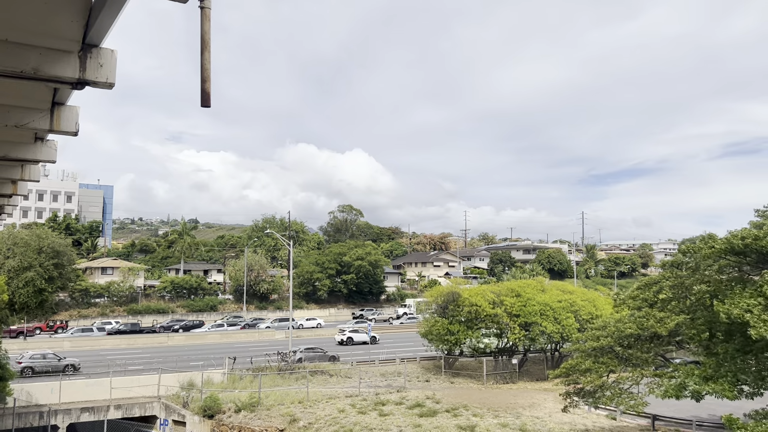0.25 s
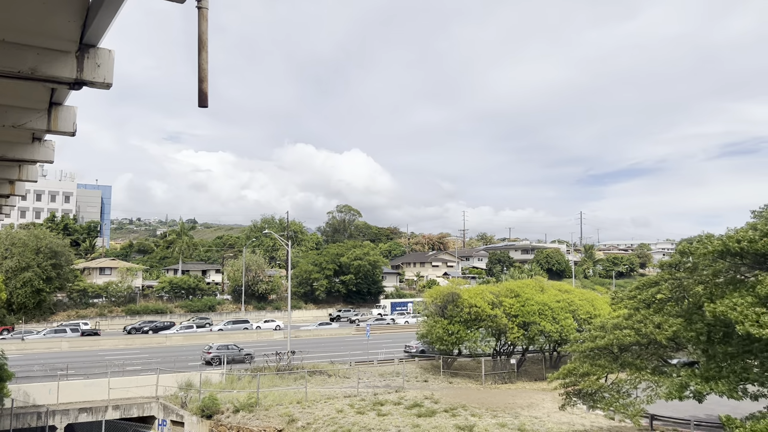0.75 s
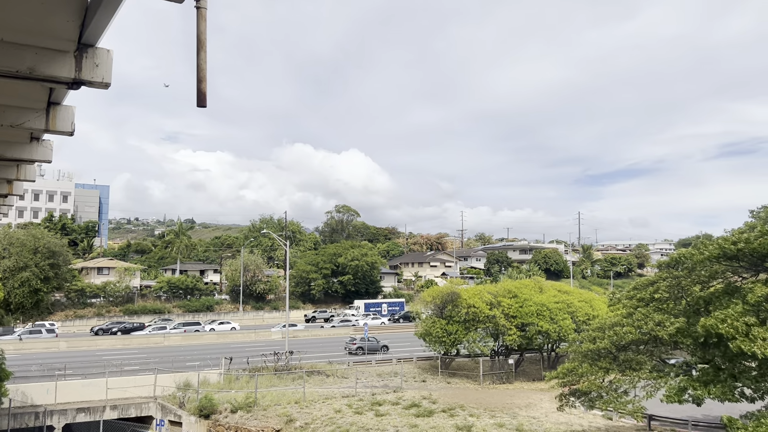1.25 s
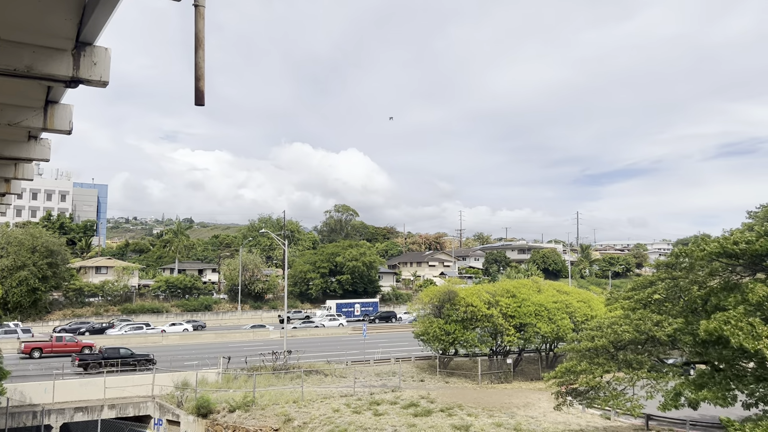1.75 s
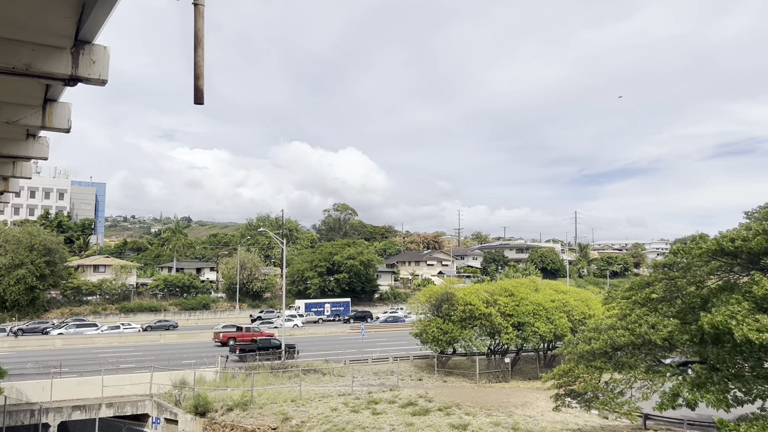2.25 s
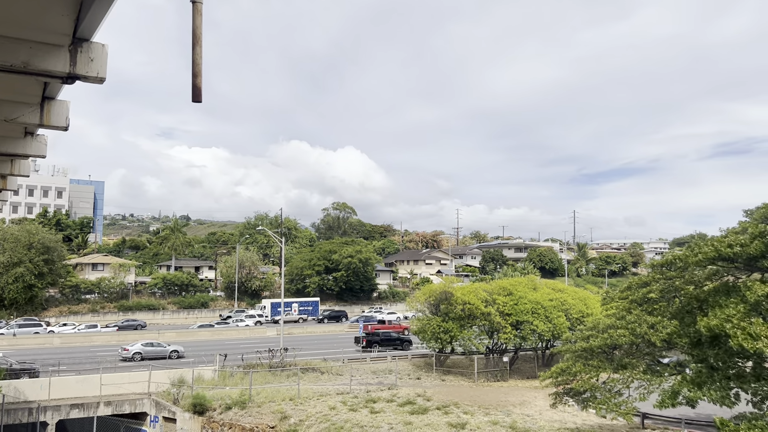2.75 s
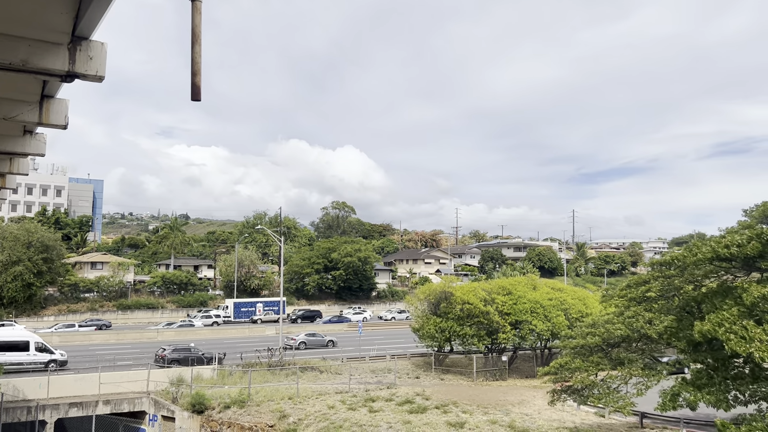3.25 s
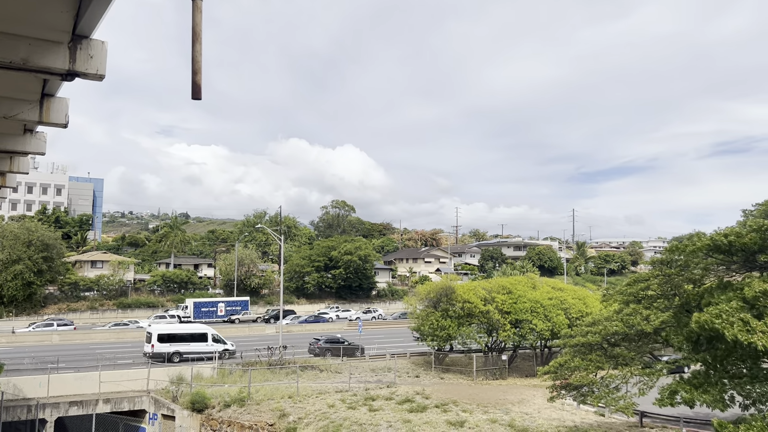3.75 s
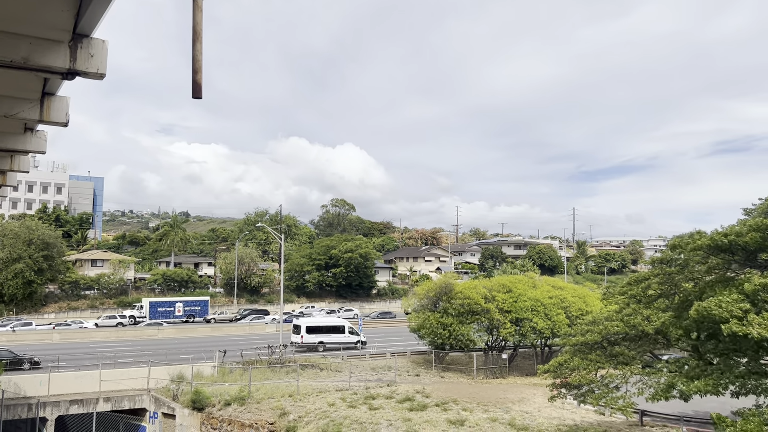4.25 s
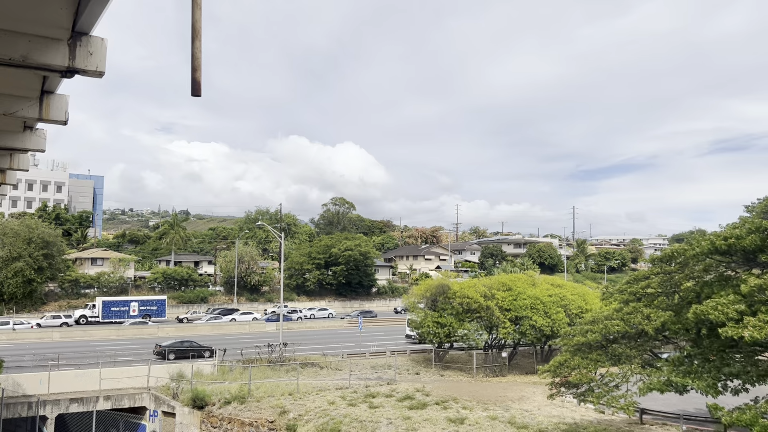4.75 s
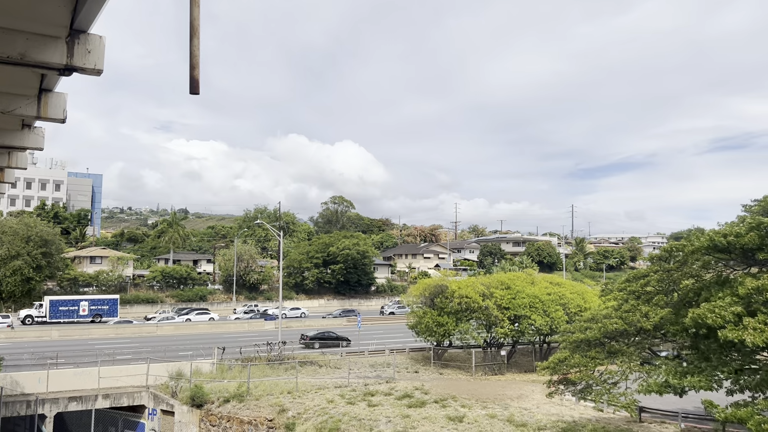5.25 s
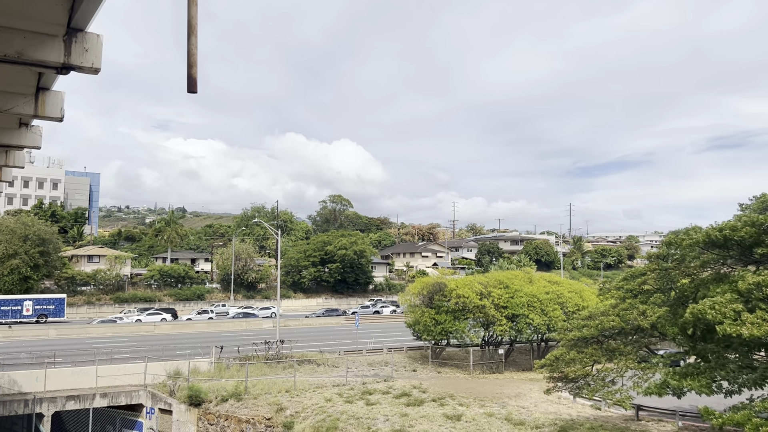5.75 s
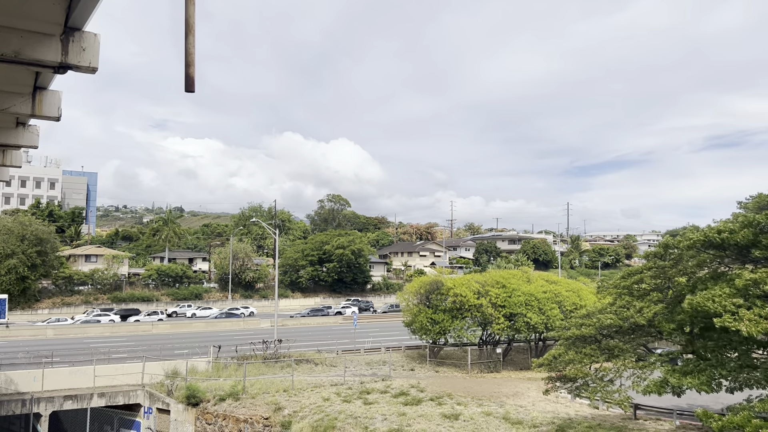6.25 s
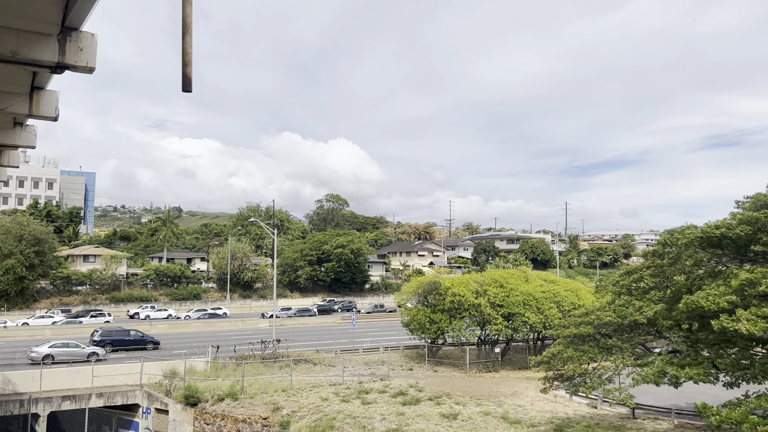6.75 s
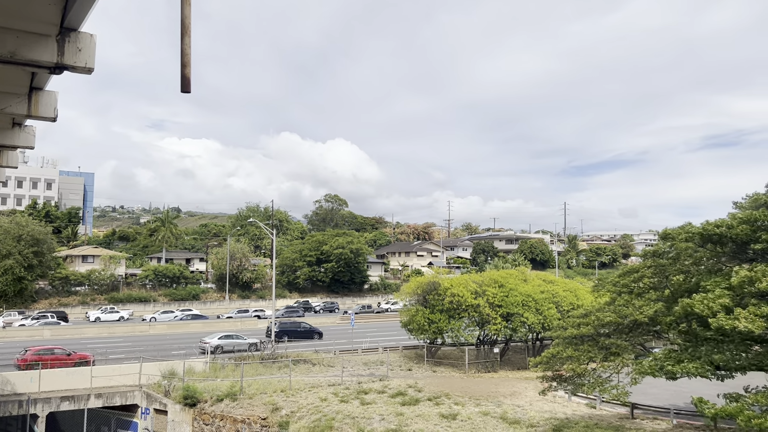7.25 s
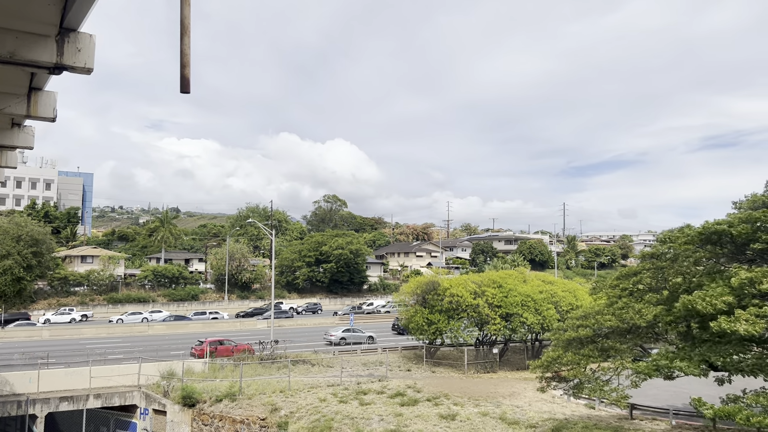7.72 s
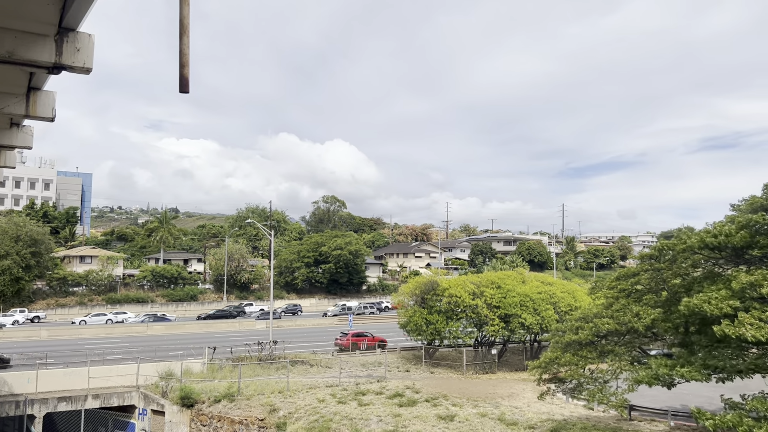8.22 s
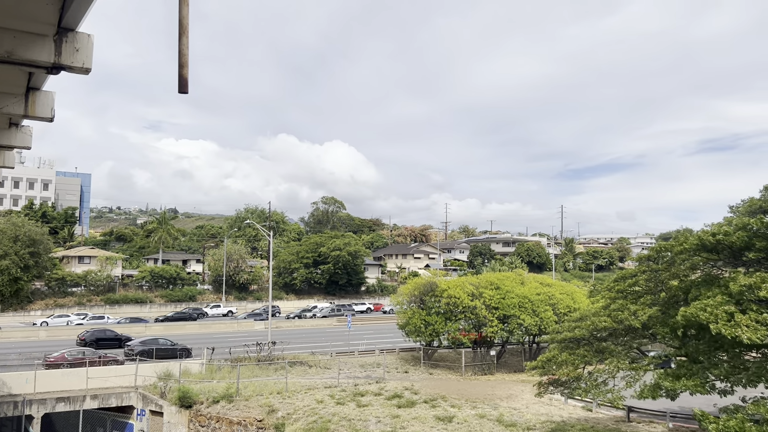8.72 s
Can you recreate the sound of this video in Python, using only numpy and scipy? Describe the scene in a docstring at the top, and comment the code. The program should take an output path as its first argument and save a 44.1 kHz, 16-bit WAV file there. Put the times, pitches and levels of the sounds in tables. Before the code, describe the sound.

Cars and trucks stream along a wide freeway, heard from above as a continuous tyre roar and hiss over low engine rumble, swelling gently as vehicles pass. Gusts of wind thump and flutter on a hand-held phone microphone, strongest in the first half and easing later. A faint machine hum sits underneath, and the hand makes a few tiny ticks and rustles.

```python
"""A ledge above a wide freeway. Many tyres add incoherently into a roar and hiss that swell as vehicles
pass; the nearest treads sing, engines rumble far off, a faint whine comes and goes and a machine hums
nearby. Turbulent gusts press on the two microphone ports of a hand-held phone as thump, flutter,
hollow boom and slaps. The hand that holds it adds small ticks and rustles of friction."""
import sys
import numpy as np
from scipy import signal
from scipy.fft import rfft, irfft, next_fast_len
from scipy.io import wavfile
from scipy.ndimage import uniform_filter1d, map_coordinates

SR = 44100
rng = np.random.default_rng(int(sys.argv[2]) if len(sys.argv) > 2 else 0)


def generate_wav(sig):
    """Save sig (samples, or channels by samples) to the path in sys.argv[1] as 16-bit PCM at SR."""
    pcm = np.round(np.clip(np.atleast_2d(sig).T, -1, 1) * 32767).astype(np.int16)
    wavfile.write(sys.argv[1], SR, pcm)


N = 396018

# stream of vehicles: (time [s], tyre roar [dB], tyre hiss [dB], swish of far tyres [dB])
TYRE_LEVELS = [(0, -26.5, -33, -53), (.35, -26.5, -35, -57), (.63, -27.5, -35, -54), (1, -28, -37, -58),
               (1.55, -30, -37, -57), (1.8, -26.5, -34, -55.5), (2.4, -28.5, -34, -54),
               (2.77, -24.5, -32.5, -54.5), (3.1, -27, -32, -53), (3.6, -25.5, -33, -55.5),
               (3.78, -27.5, -30, -52.5), (4.02, -26.5, -29, -52), (4.12, -29.5, -32.5, -55),
               (4.3, -23, -31.5, -55), (4.42, -26.5, -33, -55), (4.9, -26.5, -33.5, -55),
               (5.75, -29, -32, -55.5), (6.05, -26.5, -35, -57.5), (6.3, -31, -36, -57.5),
               (6.7, -28.5, -35, -58), (8.2, -29.5, -35.5, -57.5), (8.98, -26, -35.5, -57.5)]
# engines and distant lanes: (time [s], level [dB])
RUMBLE_LEVELS = [(0, -26.5), (2.5, -29), (4.5, -28), (6.5, -29.5), (8, -29.5), (8.98, -26.5)]
# drone of tyres and bodywork, fuller near a large vehicle: (time [s], relative level [dB])
DRONE_LEVELS = [(0.0, -35), (0.3, -30.5), (0.77, -31.5), (0.85, -29), (0.9, -34), (1.7, -34.5),
                (2.25, -28.5), (2.3, -37.5), (2.7, -31), (3.88, -34.5), (4.0, -33), (4.08, -40),
                (4.32, -26), (4.45, -32.5), (8.45, -37), (8.98, -37.5)]
# spectra of the traffic noises: (frequency [Hz], relative spectral density [dB])
ROAR_SPECTRUM = [(290, -34.5), (500, -13.5), (635, -13), (749, -1), (792, -3.5), (1030, -0.5), (1280, -6),
                 (1500, -9.5), (1950, -41.5), (3300, -120)]
HISS_SPECTRUM = [(1100, -22), (1250, -8.5), (1520, -0.5), (1690, -7.5), (1970, -6), (2250, -14),
                 (2820, -22.5), (3200, -28.5), (3800, -34.5), (4400, -45)]
SWISH_SPECTRUM = [(2900, -16.5), (3500, -3.5), (4200, -3), (4750, 1), (5400, -2.5), (6300, -9.5),
                  (7200, -16), (8200, -23), (9200, -42)]
RUMBLE_SPECTRUM = [(15, -58.5), (25, -11.5), (123, -2.5), (155, -5.5), (214, -6), (253, -5), (325, -10.5),
                   (369, -5), (568, -21), (700, -23.5), (910, -39), (1540, -120)]
DRONE_SPECTRUM = [(400, -13.5), (450, -1), (520, -2), (600, -2.5), (680, -4.5), (760, -20.5)]
# tread song of the nearest vehicles: (time [s], centre frequency [Hz], level [dB])
TREAD_BAND = [(0, 902.6, -44.5), (.35, 897.5, -34), (1.1, 856.3, -52.5), (1.55, 736.6, -35.5),
              (1.75, 833, -31), (2.05, 805, -35.5), (2.3, 803, -35.5), (2.7, 782.8, -30), (3.1, 839, -44),
              (3.6, 950, -43), (4.3, 830, -34.5), (4.8, 958, -52), (5.6, 1067, -37.5), (6.2, 1002, -49),
              (6.9, 778.6, -35.5), (7.5, 790, -42), (8.1, 858, -61), (8.7, 880, -44)]
# thin whine, perhaps a brake: (time [s], centre frequency [Hz], level [dB])
WHINE_BAND = [(1.65, 3210, -88), (1.78, 3270, -58), (1.92, 3270, -67), (2.2, 3320, -60), (2.5, 3270, -61),
              (2.65, 3320, -93)]

# gusts on the ports: (centre time [s], half length [s], thump [dB], flutter [dB], boom [dB])
GUST_SWELLS = [(0.0, 0.032, -16.5, -20, -28.5), (0.19, 0.036, -18, -31, -33.5),
               (0.33, 0.11, -13.5, -19.5, -28.5), (0.52, .03, -21, -24, -32.5),
               (0.828, .022, -14.5, -19, -25), (0.87, .025, -13.5, -20, -27), (0.93, .025, -17, -24, -27),
               (1.01, 0.023, -14, -25, -31.5), (1.09, 0.017, -20.5, -29.5, -32),
               (1.29, 0.057, -19, -27, -40), (1.41, .06, -14.5, -24, -31.5), (1.78, 0.017, -22.5, -26, -37),
               (2.05, .05, -12, -20, -32.5), (2.118, 0.03, -12, -17.5, -24),
               (2.158, 0.03, -12.5, -21.5, -29), (2.23, .025, -17.5, -20.5, -26.5),
               (2.275, 0.035, -16, -23.5, -29.5), (2.94, .05, -24, -29, -34.5),
               (3.23, 0.081, -18, -28.5, -34), (3.39, .04, -24.5, -28, -35), (3.57, 0.036, -19, -22.5, -30),
               (3.9, 0.044, -19, -22.5, -32.5), (4.01, 0.057, -19.5, -17, -26),
               (4.145, 0.017, -17, -24, -33.5), (4.22, 0.034, -15.5, -18, -26.5),
               (4.285, .03, -15.5, -19.5, -23), (4.335, .03, -15.5, -20, -24.5),
               (4.385, 0.027, -13, -25.5, -30), (4.5, 0.023, -16.5, -31, -39),
               (4.67, 0.023, -21, -26.5, -35), (4.84, 0.031, -23, -26.5, -36.5),
               (4.99, 0.024, -19, -27, -30.5), (5.08, 0.06, -20.5, -24.5, -26.5),
               (5.31, 0.027, -22, -35, -36), (5.71, 0.031, -24.5, -30.5, -31),
               (5.93, 0.055, -26.5, -31.5, -33), (6.08, 0.041, -26, -34, -27.5),
               (6.34, 0.066, -18, -25.5, -32.5), (6.47, 0.04, -23, -29, -37),
               (6.66, 0.021, -28, -30, -27.5), (6.93, 0.043, -20, -25, -39),
               (7.05, 0.027, -24, -20.5, -37.5), (7.15, 0.026, -22, -32.5, -31.5),
               (7.24, .03, -21, -31, -34.5), (7.36, 0.051, -26, -28, -34), (7.77, .06, -19, -42, -36.5),
               (7.97, 0.032, -24.5, -40.5, -41), (8.57, 0.05, -21, -41, -45),
               (8.98, 0.026, -8.5, -36, -39.5)]
# wind between the gusts: (time [s], thump [dB], flutter [dB])
BREEZE_LEVELS = [(0, -23.5, -30), (1.2, -19.5, -25), (1.6, -23, -25), (2.6, -24.5, -32), (3.3, -25, -25),
                 (4.1, -23, -26), (5.2, -24.5, -31), (6.6, -27, -28.5), (7.6, -27, -38.5), (8.2, -36, -48),
                 (8.5, -26.5, -42), (8.98, -37, -40)]
# pressure oscillation inside the gusts: (time [s], frequency [Hz])
SWING_PITCH = [(0, 57.4), (.33, 57.8), (.85, 64.05), (1.3, 56.2), (1.8, 55.05), (2.1, 62), (3.2, 67.8),
               (3.9, 62), (4.2, 60.1), (4.38, 54.8), (4.7, 66), (5.08, 55.1), (5.7, 55.7), (6.33, 52),
               (6.6, 66.3), (6.93, 53), (7.3, 68.2), (7.77, 50.84), (8.5, 70.05), (8.98, 58.1)]
# brief accents, one in the tyres' tread song (2.645 s), the others slaps inside the gusts:
# (time [s], peak level [dB], ring frequency [Hz])
RINGING_ACCENTS = [(0.812, -9.5, 614), (0.84, -11, 370), (0.856, -15, 900), (1.244, -13, 704),
                   (2.048, -10, 420), (2.076, -13, 785), (2.114, -10, 342), (2.227, -12.5, 351),
                   (2.645, -13.5, 748), (3.981, -8.5, 339), (4.296, -11.5, 793), (4.371, -12, 600)]
# spectra of the wind noises and the accents: (frequency [Hz], relative spectral density [dB])
THUMP_SPECTRUM = [(20, -27.5), (35, -14), (55, -3), (80, -1.5), (120, -11), (170, -24), (260, -47)]
FLUTTER_SPECTRUM = [(70, -20), (110, 1.5), (150, 1), (200, -3), (270, -4), (360, -11), (500, -19),
                    (700, -17), (1000, -34.5), (1400, -59)]
BOOM_SPECTRUM = [(280, -20), (340, 0), (400, -2.5), (470, -9), (580, -21.5)]
ACCENT_SPECTRUM = [(200, -16.5), (350, -2), (800, 6), (1200, -1.5), (1800, -22.5)]

# machine and engine tones, each swelling once: (frequency [Hz], steady level [dB], unsteadiness [0-1],
# swell centre [s], swell half length [s], swell level [dB])
HUM_TONES = [(150.9, -47, 1, 3.13, 0.49, -33.5), (250, -46, .35, 8.08, 0.55, -36),
             (130.1, -50, 1, 7.9, 0.27, -39), (157.4, -51.5, 1, 8.5, 0.86, -37),
             (362.2, -41.5, .35, 7.8, 2.6, -39), (391, -48, 0.8, 6.5, 2, -42)]
# ticks near the ports: (time [s], peak of the bright edge [dB], relative cavity ring [dB])
HAND_TICKS = [(0.3506, -48.5, 6), (0.973, -54, -3), (2.0163, -57, 2), (2.228, -46, -5), (3.4804, -61, 15),
              (3.681, -42.5, -4), (3.6865, -56, 4), (4.5032, -55, -1), (4.5134, -40, -5), (4.5165, -38, -1),
              (4.5242, -51, -3), (4.5294, -51, -7), (4.7145, -49, -5), (4.8085, -56, 6), (4.8214, -54, 6),
              (4.8336, -49, 5), (4.8405, -60, 6), (4.8475, -52, 5), (4.868, -52, -3), (4.9144, -61, 20),
              (5.2816, -46, -3)]
# skin brushing the case: (centre time [s], length [s], level [dB])
SKIN_STROKES = [(0.524, .061, -56), (.67, 0.065, -57), (2.123, .031, -56), (2.464, 0.05, -57),
                (4.528, 0.046, -58), (4.633, 0.03, -55), (4.698, 0.05, -54), (4.84, 0.044, -53),
                (5.29, 0.03, -60), (5.701, 0.065, -59), (6.29, 0.052, -53.5), (7.378, .051, -61)]
# skin friction: (frequency [Hz], relative spectral density [dB])
FRICTION_SPECTRUM = [(3000, -30), (4200, -2), (5000, 1.5), (6500, -7), (8000, -12.5), (10000, -34),
                     (14000, -41)]
# faint high hiss, strongest near 9-10 kHz: (frequency [Hz], relative spectral density [dB])
HIGH_HISS_SPECTRUM = [(7500, -16.5), (8800, 4.5), (10000, 4), (11500, -4.5), (13500, -5), (15000, -9)]

# airborne sound and wind at the two ports:
# (frequency [Hz], coherence [0-1], left phase lead [rad], left minus right [dB])
AIR_COHERENCE = [(40, .7, -.5, -.8), (130, .7, -.2, 0), (260, .82, -.2, 1.3), (350, .84, -.1, 3.5),
                 (450, .84, -.6, 1.3), (600, .68, -1, -2), (800, .7, -.6, -2.6), (1000, .62, -1.1, -2),
                 (1250, .55, -2.6, -3.8), (1560, .45, -3.4, -1), (1640, .15, -4.8, 2), (1700, .76, -6.2, 6),
                 (1900, .9, -6.2, 3), (2200, .55, -5.8, 3), (2700, .3, -5.6, 3.3), (3300, .12, -4.5, 1),
                 (3900, .52, -6, .2), (4700, .56, -6.3, 1), (5600, .08, -7.6, 3.4), (6800, .8, -6.3, -1),
                 (8000, .25, -7.1, -1), (9500, .8, -9.4, 0), (10800, .9, -9.4, 0), (12000, .95, -12.5, 0)]
WIND_COHERENCE = [(30, .78, -1.25, -.9), (60, .76, -1.45, -.7), (90, .76, -1.95, -.5), (130, .82, -2.8, 0),
                  (190, .85, -2.8, -1), (260, .75, -2.6, -2.5), (340, .75, -.8, -2.5), (500, .92, -.6, -.5),
                  (800, .75, -.8, -3.5), (1200, .3, -1.5, -4)]


def traffic():
    """Incoherent addition: many tyres and engines merge into noise that swells as vehicles pass."""
    roar_db, hiss_db, swish_db = curves(TYRE_LEVELS)
    rumble = amp(curves(RUMBLE_LEVELS)[0]) * noise_pair(RUMBLE_SPECTRUM, patchy_db=1.5)
    roar = amp(roar_db) * noise_pair(ROAR_SPECTRUM, patchy_db=1.23)
    hiss = amp(hiss_db) * noise_pair(HISS_SPECTRUM, patchy_db=1.13)
    swish = amp(swish_db) * noise_pair(SWISH_SPECTRUM, patchy_db=1.5)
    drone = amp(curves(DRONE_LEVELS)[0] - 2.0) * noise_pair(DRONE_SPECTRUM, patchy_db=0.5)
    return rumble + drone + roar + hiss + swish + tread_song() + whine()


def tread_song():
    """Quasi-periodic excitation: the tread blocks of the nearest tyres sing in a gliding band."""
    return narrowband(TREAD_BAND, half_width_hz=60)


def whine():
    """Narrowband noise is heard as a pitch, here high, thin and faint."""
    return narrowband(WHINE_BAND, half_width_hz=28)


def wind():
    """Turbulent pressure: eddies on the ports thump, flutter and boom; the brief accents are mixed in."""
    eddies = amp(2.5 * wobble(rate_hz=16))
    thump_db, flutter_db = curves(BREEZE_LEVELS)
    breeze_thump = amp(thump_db) * eddies
    breeze_flutter = amp(flutter_db) * eddies ** .4  # deep eddies mostly thump
    breeze_boom = amp(-8.5) * breeze_flutter
    gust_thump, gust_flutter, gust_boom = swells(GUST_SWELLS, steepness=2.2)
    breeze_thump *= breeze_thump / np.hypot(breeze_thump, gust_thump)  # gusts sweep small eddies away
    thump = gust_thump * pressure_swing() + breeze_thump * noise_pair(THUMP_SPECTRUM, patchy_db=0.5)
    lumps = amp(2.9 * wobble(rate_hz=35))
    lumpy_noise = unit(lumps * noise_pair(FLUTTER_SPECTRUM, patchy_db=1.9))
    flutter = np.hypot(breeze_flutter, gust_flutter) * lumpy_noise
    boom = np.hypot(breeze_boom, gust_boom) * noise_pair(BOOM_SPECTRUM, patchy_db=2.5)
    return at_ports(thump + flutter + boom + accents(), WIND_COHERENCE)


def pressure_swing(power_share=0.86, wander=0.0804):
    """Frequency modulation: the pressure in a gust oscillates at a wandering pitch amid low noise."""
    hz = curves(SWING_PITCH)[0] * (1 + wander * wobble(rate_hz=16))
    swing = np.sqrt(2) * np.sin(2 * np.pi * np.cumsum(hz) / SR)
    share = power_share * np.array([[1], [0]])  # only in the signal common to both ports
    return np.sqrt(share) * swing + np.sqrt(1 - share) * noise_pair(THUMP_SPECTRUM, patchy_db=2.0)


def accents(rise_s=.002):
    """Damped oscillation: each gust slap, and one accent in the tread song, rings for milliseconds."""
    noise = noise_pair(ACCENT_SPECTRUM, patchy_db=-0.5)
    out, t = np.zeros((2, N)), np.arange(1200) / SR
    envelope = t / rise_s * np.exp(1 - t / rise_s)
    for s, db, hz in RINGING_ACCENTS:
        span = slice(round(s * SR), round(s * SR) + len(t))
        ring = np.sqrt(2) * np.sin(2 * np.pi * hz * t) * np.array([[1], [0]])
        burst = (ring + noise[:, span]) * envelope
        out[:, span] += amp(db) * burst / np.abs(burst[0]).max()
    return out


def machine_hum():
    """Periodic vibration: machine and engines radiate tones that waver in amplitude and phase."""
    out, t = np.zeros(N), np.arange(N) / SR
    for hz, db, waver, *swell in HUM_TONES:
        level = np.hypot(amp(db), swells([swell])[0]) * amp(2.5 * waver * wobble(6))
        drift = waver * (0.8 * wobble(6) + 0.66 * wobble(25))
        out += level * np.sqrt(2) * np.sin(2 * np.pi * hz * t + drift)
    return out


def ticks(cavity_hz=4900, cavity_t60_s=0.009, edge_t60_s=0.01):
    """Cavity resonance: clicks from the hand, each with a bright edge, set the port ringing."""
    out, t = np.zeros(N + SR), np.arange(300) / SR
    bright = signal.butter(3, [4800, 8600], "bandpass", fs=SR, output="sos")
    rise = 1 - np.exp(-t / .0003)
    cavity = 2 * np.sin(2 * np.pi * cavity_hz * t) * amp(-60 * t / cavity_t60_s) * rise
    for s, db, cavity_db in HAND_TICKS:
        crack = 0.28 * rng.standard_normal(len(t)) * amp(-60 * t / edge_t60_s)
        edge = signal.sosfilt(bright, (t == 0) + crack)
        out[round(s * SR):][:len(t)] += amp(db) * (amp(cavity_db) * cavity + edge / np.abs(edge).max())
    return out[:N]


def rustles():
    """Sliding friction: skin on the case makes short swells of grainy noise."""
    t = np.arange(N) / SR
    strokes = sum(amp(db) * np.exp(-2 * ((t - s) / length) ** 2) for s, length, db in SKIN_STROKES)
    grains = rng.standard_normal((2, N)) * amp(2.8 * wobble(rate_hz=250))
    return strokes * unit(filtered(grains, passband(FRICTION_SPECTRUM)))


def at_ports(pair, ports):
    """Partial coherence: the first signal reaches both ports, the second only the right."""
    def mixing(hz):
        coherence, lead, balance_db = over_frequency(ports, hz)
        left, right = amp(balance_db / 2), amp(-balance_db / 2)
        common = right * coherence * np.exp(-1j * lead)
        separate = right * np.sqrt(1 - coherence ** 2)
        return np.array([[left, 0 * hz], [common, separate]])
    return filtered(pair, mixing).sum(axis=1)


def noise_pair(spectrum, patchy_db):
    """Spectral shaping: two independent noises at rms 1 share random gain patches in time and pitch."""
    cells = signal.stft(rng.standard_normal((2, N)), nperseg=1024)[2]
    patches = uniform_filter1d(rng.standard_normal(cells.shape[1:]), size=10, axis=0)
    patches = uniform_filter1d(patches, size=8, axis=1)
    pair = signal.istft(cells * amp(patchy_db * unit(patches)), nperseg=1024)[1][:, :N]
    return unit(filtered(pair, passband(spectrum)))


def narrowband(rows, half_width_hz):
    """Quadrature modulation shifts low-pass noise to a moving centre frequency."""
    centre_hz, db = curves(rows)
    lowpass = signal.butter(2, half_width_hz, fs=SR, output="sos")
    in_phase, quadrature = signal.sosfilt(lowpass, rng.standard_normal((2, 2, N)))
    phase = 2 * np.pi * np.cumsum(centre_hz) / SR
    return amp(db) * unit(in_phase * np.cos(phase) + quadrature * np.sin(phase))


def swells(rows, steepness=2):
    """Bell-shaped swells add in power, one gain curve per level; steepness above 2 flattens the top."""
    t = np.arange(0, N, 64) / SR
    centre, half_length, *levels = np.transpose(rows)
    bells = np.exp(-np.abs((t - centre[:, None]) / half_length[:, None]) ** steepness)
    return [np.interp(np.arange(N) / SR, t, np.sqrt(amp(db) ** 2 @ bells ** 2)) for db in levels]


def wobble(rate_hz):
    """Spline interpolation joins random knots into a smooth fluctuation."""
    knots = rng.standard_normal(int(N * rate_hz / SR) + 4)
    coarse = np.arange(0, N + 32, 32)
    return np.interp(np.arange(N), coarse, map_coordinates(knots, [coarse * rate_hz / SR]))


def filtered(x, response):
    """Linear filtering multiplies the spectrum by a frequency response."""
    size = next_fast_len(N + 8192)
    return irfft(rfft(x, size) * response(np.fft.rfftfreq(size, 1 / SR)), size)[..., :N]


def passband(spectrum):
    """Band-pass response that follows the spectrum and is zero outside it."""
    return lambda hz: amp(over_frequency(spectrum, hz)[0]) * (hz > spectrum[0][0]) * (hz < spectrum[-1][0])


def over_frequency(rows, hz):
    """Log-frequency interpolation of each column after the first."""
    row_hz, *columns = np.transpose(rows)
    return [np.interp(np.log(hz + 1), np.log(row_hz + 1), column) for column in columns]


def curves(rows):
    """Linear interpolation of each column after the time, one value per sample."""
    times, *columns = np.transpose(rows)
    return [np.interp(np.arange(N) / SR, times, column) for column in columns]


def amp(db):
    """Amplitude ratio of a level in dB."""
    return 10 ** (np.asarray(db) / 20)


def unit(x):
    """Normalisation to rms 1."""
    return x / np.sqrt(np.mean(x ** 2) + 1e-20)


def scene():
    """Superposition: airborne sound, wind and ticks add at the ports, each with its own balance."""
    air = traffic() + rustles() + machine_hum() * np.array([[1], [.3]])
    return at_ports(air, AIR_COHERENCE) + wind() + ticks() * amp([[-.6], [.6]])


def record(dry, ceiling=.93, band_limit_hz=15200):
    """Soft saturation rounds the strongest thumps; a faint high hiss is added and the band is limited."""
    high_hiss = amp(-81.0) * at_ports(noise_pair(HIGH_HISS_SPECTRUM, patchy_db=3.5), AIR_COHERENCE)
    rounded = dry / (1 + np.abs(dry / ceiling) ** 8) ** (1 / 8)
    fade_in = np.minimum(np.arange(N) / 200, 1)
    return filtered((rounded + high_hiss) * fade_in, lambda hz: hz < band_limit_hz)


dry = scene()
out = record(dry)
generate_wav(out)
```